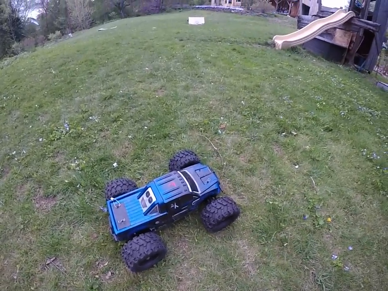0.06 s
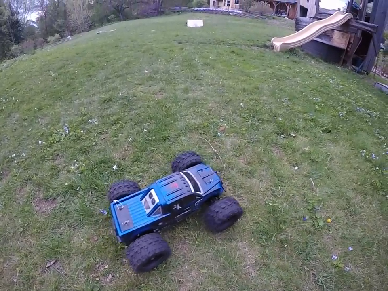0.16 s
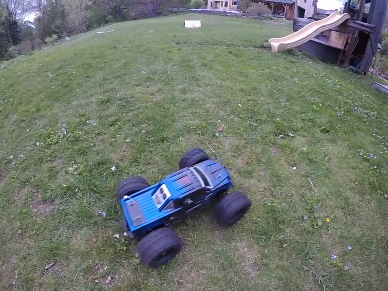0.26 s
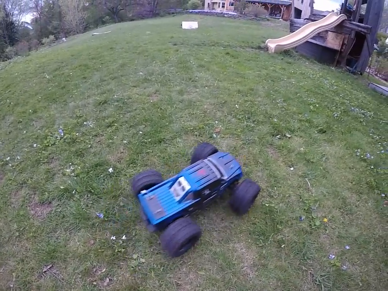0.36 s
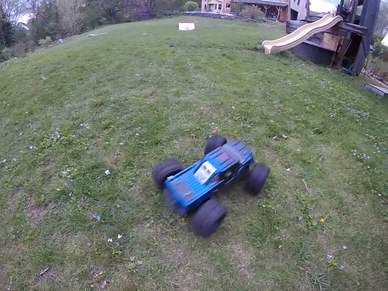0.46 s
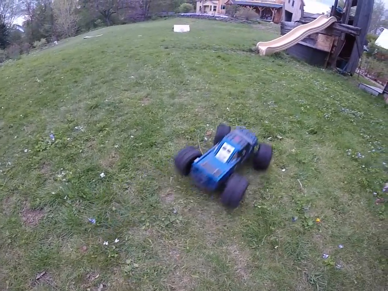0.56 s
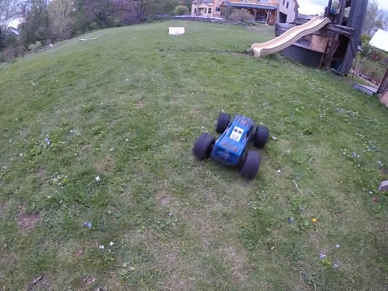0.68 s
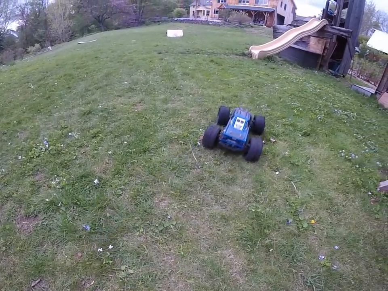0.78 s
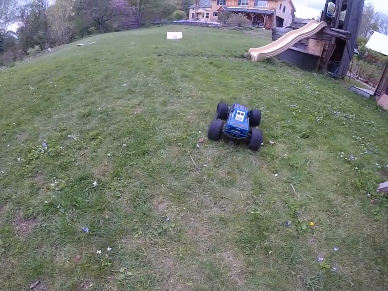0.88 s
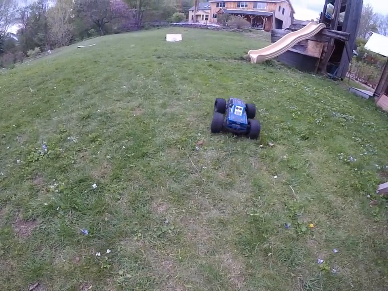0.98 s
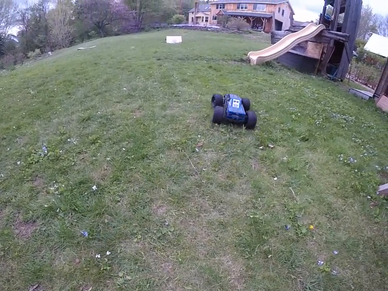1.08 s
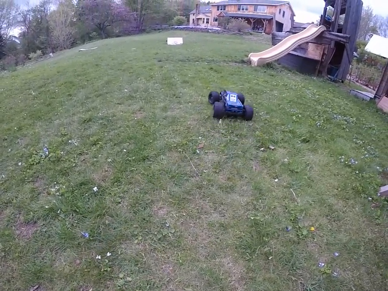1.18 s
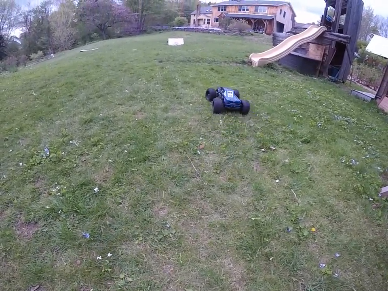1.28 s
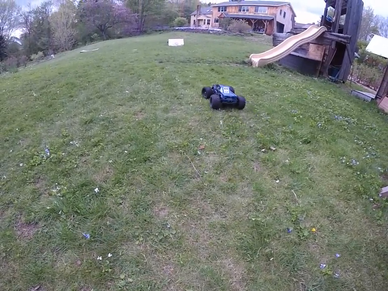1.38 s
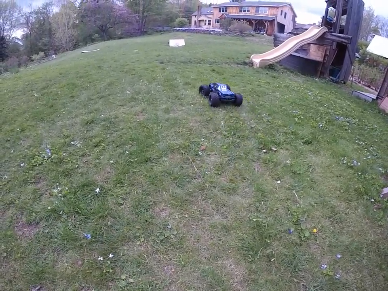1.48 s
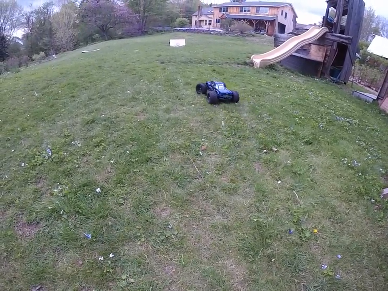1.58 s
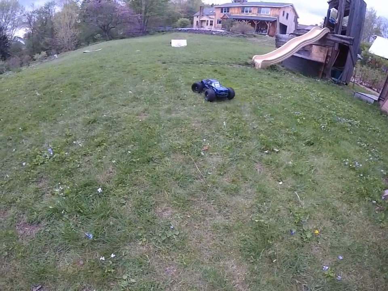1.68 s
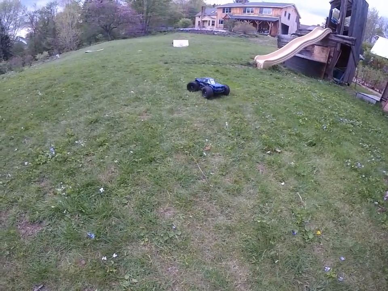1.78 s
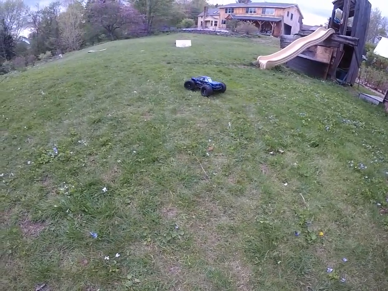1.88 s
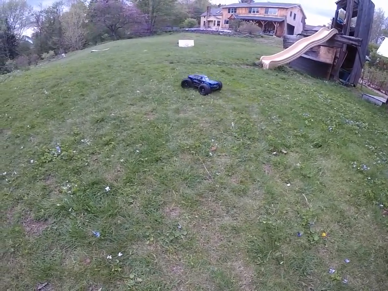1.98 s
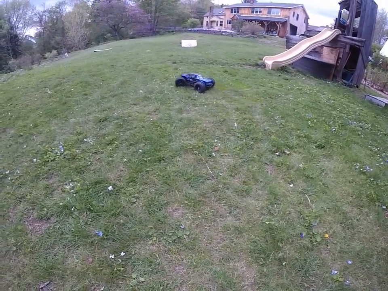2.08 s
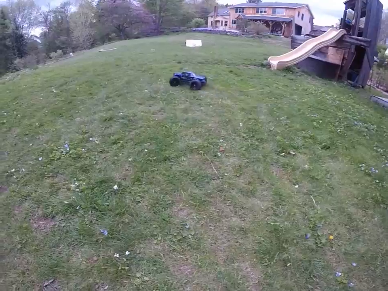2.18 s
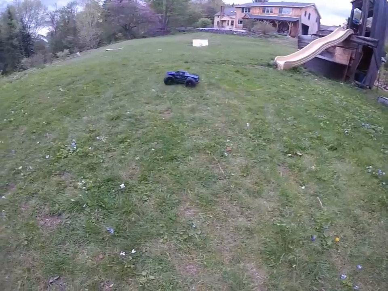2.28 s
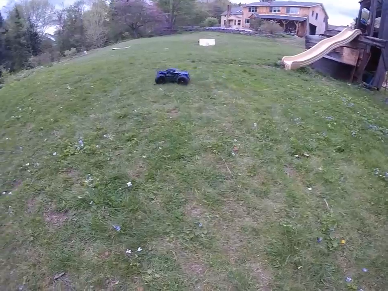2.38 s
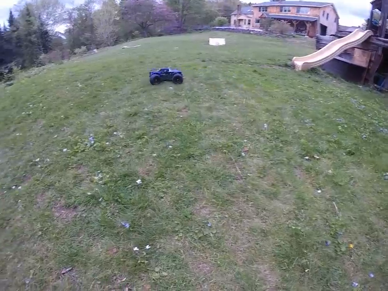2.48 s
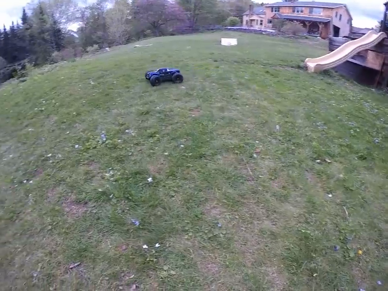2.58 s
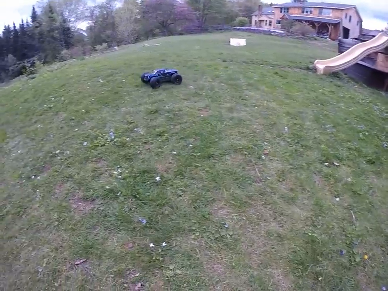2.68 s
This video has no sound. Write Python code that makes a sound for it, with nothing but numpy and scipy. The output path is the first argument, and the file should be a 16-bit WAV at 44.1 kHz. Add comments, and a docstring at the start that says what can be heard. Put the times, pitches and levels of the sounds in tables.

```python
"""Over quiet open air, a toy electric truck stutters into motion on a lawn, then drives in four bursts.
Motor and gears sing through the plastic body: sine waves and noise follow tables of pitch and level.
The controller whistles on one wavering sine; jerks, shell clacks and low bumps are short fading strikes.
Tyres rustle as filtered noise, two faint birds slide down in pitch, and a loose part jingles late on.
A low rumble of filtered noise swells near the end."""
import sys
import numpy as np
from scipy import signal
from scipy.fft import rfft, irfft
from scipy.io import wavfile
from scipy.ndimage import uniform_filter1d

SR = 44100
rng = np.random.default_rng(int(sys.argv[2]) if len(sys.argv) > 2 else 0)


def waveform_to_disk(signal):
    """Save audio, clipped to [-1, 1], as 16-bit WAV at the path in sys.argv[1]."""
    frames = np.transpose(np.atleast_2d(signal))
    scaled = np.clip(frames, -1, 1) * 32767
    samples = np.round(scaled).astype(np.int16)
    wavfile.write(sys.argv[1], SR, samples)


N = 119070
T = np.arange(N) / SR
DIFFUSE, TREBLE_DIFFUSE = 0.31, 0.53  # scattered stereo noise, as a share of the placed noise


def undb(db):
    """Turn decibels into a gain."""
    return 10 ** (np.asarray(db) / 20)


def unit(x):
    """Scale a sound to an rms (average strength) of 1."""
    return x / np.sqrt(np.mean(x ** 2))


def curve(rows, axis=1):
    """Join one column of a table by straight lines in time."""
    rows = np.array(rows)
    return np.interp(T, rows[:, 0], rows[:, axis])


def response(points, hz):
    """Read the gain at any frequency from a table of Hz and dB."""
    f, db = np.array(points).T
    return undb(np.interp(np.log(hz + 1), np.log(f + 1), db))


def colour(x, points, turn=1):
    """Filter a sound by a table of Hz and dB; turn=1j also shifts it by a quarter cycle."""
    hz = np.arange(N + 1) * SR / (2 * N)
    spectrum = rfft(x, 2 * N) * response(points, hz)
    return irfft(turn * spectrum)[..., :N]


def noise(points):
    """Make filtered noise of rms 1."""
    return unit(colour(rng.standard_normal(N), points))


def walk(rate):
    """Wander at random with rms 1, choosing a new target this many times a second."""
    k = int(SR / rate)
    steps = np.repeat(rng.standard_normal(N // k + 1), k)
    return unit(uniform_filter1d(steps, k)[:N])


def place(x, pan_db=0):
    """Two microphone ports hear a source out of step and at different levels."""
    # Each row: frequency in Hz, side signal against middle signal in dB.
    port_response = [(50, -34), (150, -7), (380, -21), (700, -3), (1290, 2.5), (2380, -5.5), (4400, -32),
                     (8000, 3.5), (15000, -22)]
    side = colour(x, port_response, 1j)
    return np.array([(x + side) * undb(pan_db / 2), (x - side) * undb(-pan_db / 2)])


def wide(points, spread):
    """Stereo noise: one placed source plus a share that differs in each ear, as if from all around."""
    return place(noise(points)) + spread * np.array([noise(points), noise(points)])


def gate(start, end, edge_s=0.002):
    """Switch on between two times, with short ramps."""
    return np.clip(np.minimum(T - start, end - T) / edge_s + .5, 0, 1)


def strike(start, rise_s, decay_s):
    """A struck object's loudness: a straight rise, then an exponential fade."""
    age = T - start
    return np.clip(age / rise_s, 0, 1) * np.exp(-np.maximum(age - rise_s, 0) / decay_s)


def garden():
    """Filtered noise makes open air, a narrow high hiss and a low rumble that swells near the end."""
    # Tone of the open air. Each row: frequency in Hz, relative level in dB.
    air_colour = [(76, -27), (130, 6), (271, 5.5), (637, -7.5), (777, -6.5), (948, -0.5), (1380, -15),
                  (1500, -18), (4380, -12.5), (4740, -18), (5130, -13.5), (7190, -15), (9130, -14),
                  (10700, -23.5), (15000, -26.5)]
    # Loudness of the rumble. Each row: time in seconds, level in dB before its flutter.
    rumble_level = [(0, -58), (1.0, -58.5), (2.0, -53.5), (2.35, -49), (2.48, -43.5), (2.58, -43.5),
                    (2.7, -50.5)]
    # Tone of the rumble. Each row: frequency in Hz, relative level in dB.
    rumble_colour = [(30, -1.5), (70, -2), (150, 6), (220, -6.5), (400, -7), (1500, -57.5)]
    air = wide(air_colour, 2.47) * undb(-58 + 2.05 * walk(13))
    hiss_hz, width_hz, hiss_db = 10480, 228, -67
    band = [(hiss_hz - 3 * width_hz, -60), (hiss_hz - width_hz, -3), (hiss_hz, 0),
            (hiss_hz + width_hz, -3), (hiss_hz + 3 * width_hz, -60)]
    hiss = wide(band, 1.0) * undb(hiss_db)
    rumble = wide(rumble_colour, 0.9) * undb(curve(rumble_level) + 2 * walk(20))
    return air + hiss + rumble


def tyres():
    """Knobbly tyres brush and crackle through grass: noise with a fast and a slow flutter."""
    # Loudness of the rolling. Each row: time in seconds, relative level in dB.
    roll_level = [(0, -53.5), (.13, -50.5), (.25, -40.5), (.45, -34), (.62, -37.5), (.72, -38), (.83, -46),
                  (.95, -46), (1.15, -45.5), (1.42, -51), (1.65, -48), (1.88, -50.5), (2.1, -42.5),
                  (2.4, -37.5), (2.55, -44.5), (2.7, -43.5)]
    # Tone of the grass. Each row: frequency in Hz, relative level in dB.
    grass_colour = [(100, -9.5), (180, 4), (350, 1), (600, 2.5), (900, -12.5), (1600, -2), (2400, -6.5),
                    (3500, -9.5), (5000, -13.5), (7000, -12), (11000, -39), (15000, -70)]
    grain_db = 1.5
    level_db = curve(roll_level) - 3 + grain_db * walk(700) + 2 * walk(35.06)
    return wide(grass_colour, TREBLE_DIFFUSE) * undb(level_db)


def controller():
    """Switching in the speed controller gives a thin whistle while the throttle is partly open."""
    # Each row: start in seconds, end in seconds, relative level in dB.
    whistle_times = [(.138, 0.292, -3.5), (0.312, 0.641, -3), (0.885, 1.127, -6.5), (1.565, 1.756, -7.5),
                     (1.94, 2.238, -4), (2.36, 2.453, 0)]
    whistle_hz, wander_rad, whistle_db = 8050, .45, -49
    level = sum(gate(start, end) * undb(db) for start, end, db in whistle_times)
    flutter = undb(whistle_db + 2 * walk(40.74))
    whistle = np.sin(2 * np.pi * whistle_hz * T + wander_rad * walk(120))
    return place(level * flutter * whistle)


def clacks():
    """The thin shell snaps against its posts, bounces once and buzzes out."""
    # Each row: start in seconds, relative level in dB, left against right in dB,
    # treble against middle in dB.
    clack_rows = [(0.139, -33.5, -2, -6), (0.183, -36.5, -1, 23), (0.2133, -58, 1, -2),
                  (0.2293, -20, -1, -1.5), (0.3007, -23.5, -1, -4), (0.3289, -37, 5, 11),
                  (0.4076, -31, -5, 13), (0.526, -27.5, -1.5, 5), (0.5993, -31, -6, 1),
                  (0.65, -34.5, -3, 9), (0.6904, -20.5, -2.5, -7.5), (0.716, -29, -1.0, -15),
                  (0.7742, -21.5, 0, -5.5), (0.789, -35, -7, -23.5), (0.864, -23.5, 0, -3),
                  (0.9156, -23.5, -1, -7), (0.946, -25.5, -3, -12), (1.0304, -35, -2, -19),
                  (1.118, -27, 0.0, -11), (1.1357, -23, -1, -7.5), (1.216, -28.5, 0, -6.5),
                  (1.24, -26.5, 0, -8), (1.3289, -34, -2, -8), (1.35, -32, 0, -9), (1.473, -25, -0.5, -4.5),
                  (1.5013, -41, 2, -11), (1.5739, -29, -1, -4.5), (1.5848, -31.5, 0, -2),
                  (1.772, -33.5, -1, 0), (1.781, -40, 0, -5), (1.8742, -31, 0, -5), (1.8968, -30.5, 0, -5),
                  (1.935, -31, 0, -4), (1.9474, -26, -1, -5.5), (2.2374, -34.5, 0.0, 8),
                  (2.4528, -34, -5, 3), (2.5178, -30, 0, -4), (2.536, -37, -1.0, 2), (2.585, -28, 1, -4.5),
                  (2.6515, -26.5, 1, -6)]
    # Tone of the shell. Each row: frequency in Hz, relative level in dB.
    shell_colour = [(200, -37.5), (600, -24), (1000, -18.5), (1600, -11), (2600, -9.5), (3200, -1),
                    (3550, 3), (3800, -0.5), (4100, 6.5), (4900, -9), (6400, 0.5), (8000, -12),
                    (11000, -25.5), (13300, -20), (16000, -47)]
    clack_db, rise_s, decay_s = -7, 0.0011, 0.0028
    rattle_rise_s, rattle_decay_s, rattle_db = 0.0027, 0.03, -18
    bounce_s, bounce_db = 0.0042, -15.5  # average delay, level against the first snap
    dull, bright = 0, 0
    for start, db, pan_db, treble_db in clack_rows:
        again = start + bounce_s * (.5 + rng.random())
        snap = strike(start, rise_s, decay_s)
        bounce = undb(bounce_db) * strike(again, rise_s, decay_s)
        rattle = undb(rattle_db) * strike(start, rattle_rise_s, rattle_decay_s)
        pan = np.array([[pan_db], [-pan_db]]) / 2
        loudness = (snap + bounce + rattle) * undb(db + clack_db + pan)
        dull = dull + loudness * undb(-treble_db / 2)
        bright = bright + loudness * undb(treble_db / 2)
    buzz = wide(shell_colour, TREBLE_DIFFUSE)
    middle = colour(buzz, [(3000, 5.5), (5500, -17.5), (9000, -50)])  # Hz, dB
    return dull * middle + bright * (buzz - middle)


def jerks():
    """The motor cogs with a short gritty buzz as gear slack is taken up; the chassis thuds on after it."""
    # The drive jerks as the motor catches. Each row: start in seconds, relative level in dB.
    jerk_rows = [(0.142, -25.5), (.177, -31), (0.206, -33.5), (0.229, -24.5), (0.237, -25), (0.264, -25),
                 (.301, -27.5), (0.307, -21), (0.331, -21), (0.35, -20.5), (0.369, -25), (0.623, -27.5),
                 (0.922, -27.5), (1.588, -37), (1.956, -40), (2.418, -29)]
    # Tone of the buzz and grit. Each row: frequency in Hz, relative level in dB.
    jerk_colour = [(120, -32), (300, -15), (600, 5), (900, -7), (1300, 1.5), (1900, 3.5), (2300, -0.5),
                   (2700, -19.5), (5000, -11), (12000, -37)]
    # Tone of the chassis thud. Each row: frequency in Hz, relative level in dB.
    thud_colour = [(100, -26), (250, 2.5), (400, 7), (600, 8), (900, -8), (3000, -56)]
    cog_hz, wobble = 320, .025  # wobble is a share of the pitch
    rise_s, crunch_decay_s, thud_decay_s = 0.0032, 0.0056, 0.023
    buzz_db, grit_db, thud_db = -4.5, -4, -13
    phase = 2 * np.pi * np.cumsum(cog_hz * (1 + wobble * walk(150))) / SR
    harmonics = sum(np.sin(k * phase + 2 * np.pi * rng.random()) for k in range(1, 9))
    buzz = place(unit(colour(harmonics, jerk_colour)))
    teeth = undb(buzz_db) * buzz + undb(grit_db) * wide(jerk_colour, DIFFUSE)
    crunch = sum(undb(db) * strike(start, rise_s, crunch_decay_s) for start, db in jerk_rows)
    thud = sum(undb(db + thud_db) * strike(start, rise_s, thud_decay_s) for start, db in jerk_rows)
    return crunch * teeth + thud * wide(thud_colour, DIFFUSE)


def drive():
    """Motor harmonics, shaft tones and gear rasp follow the speed and sound through the body."""
    # One table per burst of throttle. Each row: time in seconds, motor pitch in Hz before its wobble.
    speed_tables = [
        [(.36, 470.4), (.385, 487.4), (.41, 540.3), (.423, 633.5), (.444, 672), (.475, 602), (.497, 634.6),
         (.523, 787), (.57, 756.7), (.59, 773), (.613, 885), (.638, 754)],
        [(.89, 538.4), (.925, 550.8), (.94, 641), (.955, 616.6), (.978, 656.4), (1.015, 610), (1.04, 642),
         (1.063, 661), (1.125, 552)],
        [(1.595, 419.8), (1.61, 453.6), (1.635, 495.5), (1.652, 545.4), (1.68, 555.7), (1.708, 509),
         (1.735, 582)],
        [(1.94, 539.7), (1.995, 566.5), (2.025, 626), (2.052, 572.5), (2.085, 767), (2.11, 767.2),
         (2.15, 685.7), (2.178, 605.3), (2.215, 763), (2.25, 814), (2.275, 937.4), (2.305, 1064),
         (2.332, 983.4), (2.37, 1221), (2.395, 1185), (2.418, 1415), (2.433, 1148)],
    ]
    # One table per burst. Each row: time in seconds, relative level in dB, left against right in dB,
    # relative level of the gear hiss in dB, lift of the first harmonic in dB.
    effort_tables = [
        [(0.345, -27, -13, -45, 0), (0.38, -27.5, -3, -37, -10), (0.415, -27.5, -8, -42, -19),
         (0.421, -22, -6, -47, -7), (0.471, -18.5, -3.5, -42.5, 2.5), (0.583, -19.5, 0.5, -32, 9),
         (0.591, -30.5, 0, -33, 3), (0.635, -28.5, 4, -38, 6.5), (0.647, -45, 4, -50, 0),
         (0.66, -49, 1.0, -54, 0)],
        [(0.87, -50, -1, -43, -12), (0.905, -37, 2, -39, -15), (0.919, -37, 7, -33, -6),
         (0.925, -22, 1, -45, -14), (0.937, -34, 1, -37.5, 4), (0.983, -26, 0.5, -35.5, -1.5),
         (1.009, -35.5, 4, -39, -7), (1.037, -27, -1.5, -36.5, 2.5), (1.093, -41, 5, -41, -5),
         (1.143, -42, -7, -52, 30), (1.15, -56, 1.5, -48, 0)],
        [(1.575, -65.5, 1.5, -55, -5.5), (1.593, -36, 8, -41, -4), (1.605, -41, 4, -44, 7),
         (1.631, -33.5, -1, -44, 3.5), (1.715, -39.5, 2, -40, -3.5), (1.751, -43, -2, -44.5, 3),
         (1.82, -68, 0, -52, 0)],
        [(1.945, -44, -7, -36, 29), (1.961, -30.5, 3.5, -46, 5.5), (2.031, -24.5, -1, -43, 2.5),
         (2.051, -28.5, 3, -38, -1.5), (2.129, -31.5, 4.5, -41, -1), (2.169, -28, -1.5, -47, 9),
         (2.257, -34.5, 8, -43.5, 2), (2.325, -30.5, 5.5, -34, 7.5), (2.42, -35, 6, -40, -0.5),
         (2.459, -31.5, 16, -33, 2.5), (2.47, -49, 3, -63, 0)],
    ]
    # Each row, one per burst: motor harmonics 1 to 4, gear rasp, shaft tones, all relative levels in dB.
    timbre_rows = [(-0.52, 9.5, -4.5, -3, -8.5, -14.5), (1, 3.5, 8, 4.5, -4, -13),
                   (0, 2.5, -6.5, -14.5, -6.5, -19), (0.6, 0, -0.5, 3.5, -9, -19)]
    # Response of the body. Each row: frequency in Hz, relative level in dB.
    body_colour = [(120, -11), (250, -9), (400, 1), (480, -10), (610, 9), (690, 1), (765, -3.5),
                   (850, -11.5), (1030, -10), (1150, -10.5), (1300, -3.5), (1430, -3), (1570, 6.5),
                   (1730, 5.5), (1900, 6), (2100, 2), (2300, 1), (2500, -11.5), (2750, -24), (3100, -9.5),
                   (4300, -16), (8000, -42)]
    # Tone of the gear hiss. Each row: frequency in Hz, relative level in dB.
    gear_colour = [(1500, -1), (2700, 2.5), (3100, 10.5), (4200, 1.5), (5000, -7), (6300, 1.5), (7700, -7),
                   (8700, -18), (11000, -33), (15000, -67)]
    # The drive shafts bind once a turn, so level and speed throb.
    throb_cycles, throb_db, throb_sag = 16, 2.4, .012  # motor cycles per turn, dB, share of the speed
    wobble, slip_rad, flutter_db = .015, .28, 3.4  # random share of the pitch, phase slip, level flutter
    chatter_hz, chatter_db = 330.8, 1.8  # gear teeth rattle in their slack
    # At high speed the gears scream: harmonics from the third up gain between two pitches.
    scream_from_hz, scream_full_hz, scream_db = 770, 1060, 4.5
    upper_db, mesh_depth = -4, 0.56  # harmonics 5 to 7, swing of the rasp and hiss as teeth mesh
    whine_db, hiss_share_db = -3, -2.5
    out = 0
    for speed, effort, timbre in zip(speed_tables, effort_tables, timbre_rows):
        first, second, third, fourth, rasp_db, shaft_db = timbre
        turn = 2 * np.pi * np.cumsum(curve(speed)) / SR / throb_cycles + 0.67 * walk(30)
        hz = curve(speed) * (1 + wobble * walk(170) + throb_sag * np.cos(turn))
        phase = 2 * np.pi * np.cumsum(hz) / SR

        scream = scream_db * np.clip((hz - scream_from_hz) / (scream_full_hz - scream_from_hz), 0, 1)
        harmonics = [first + curve(effort, axis=4), second]
        harmonics += [db + scream for db in [third, fourth] + [upper_db] * 3]
        shafts = [(k + .5, shaft_db) for k in range(1, 5)]  # halfway between the harmonics
        tone = 0
        for k, db in list(enumerate(harmonics, 1)) + shafts:
            level = undb(db + flutter_db * walk(80))
            tone = tone + level * np.sin(k * phase + slip_rad * walk(200) + 2 * np.pi * rng.random())
        tone = colour(tone, body_colour)
        # even out the slow loudness changes, leaving those to the effort table
        tone = tone / np.sqrt(uniform_filter1d(tone ** 2, size=1300) + 1e-12)
        tone = tone * undb(chatter_db * walk(chatter_hz) + throb_db * np.sin(turn))
        tone = tone * gate(speed[0][0], speed[-1][0], 0.0074)

        mesh = (1 + mesh_depth * np.sin(phase / 2)) * undb(throb_db * np.sin(turn) / 2)
        song = place(tone) + undb(rasp_db - 3) * mesh * wide(body_colour, DIFFUSE)
        pan = curve(effort, axis=2) * np.array([[1], [-1]]) / 2
        song = song * undb(curve(effort) - 3.5 + pan)

        # the gear teeth add high tones at every half multiple of the motor pitch
        whine = 0
        for k in range(7, 22):
            whine = whine + undb(flutter_db * walk(50)) * np.sin(k * phase / 2 + 2 * np.pi * rng.random())
        gears = undb(whine_db) * place(unit(colour(whine, gear_colour)))
        gears = gears + undb(hiss_share_db) * mesh * wide(gear_colour, TREBLE_DIFFUSE)
        hiss = gears * undb(curve(effort, axis=3) - 4 + 2.2 * walk(150))
        out = out + gate(effort[0][0], effort[-1][0]) * (song + hiss)
    return out


def bumps():
    """Soft hollow tyres and the chassis boom over bumps, each a low sine that soon fades."""
    # Each row: start in seconds, pitch in Hz, relative level in dB.
    bump_rows = [(0.359, 400, -23.5), (1.585, 430, -36.5), (1.775, 300, -44.5), (2.435, 291, -42.5),
                 (2.45, 162, -35), (2.502, 158, -32), (2.555, 147, -35), (2.615, 153.6, -41.5)]
    rise_s, decay_s = 0.009, 0.021
    boom = 0
    for start, hz, db in bump_rows:
        ring = np.sin(2 * np.pi * hz * (T - start))
        boom = boom + undb(db) * strike(start, rise_s, decay_s) * ring
    return place(boom)


def bird():
    """Faint downward bird whistles: sine waves with a falling, slightly wavering pitch."""
    # Each row: start in seconds, end in seconds, first pitch in Hz, last pitch in Hz, relative level in dB.
    slur_rows = [(1.42, 1.45, 7900, 6600, -56), (1.788, 1.87, 4520, 3680, -51)]
    out = 0
    for start, end, from_hz, to_hz, db in slur_rows:
        hz = curve([(start, from_hz), (end, to_hz)]) * (1 + .006 * walk(400))
        swell = np.sin(np.pi * np.clip((T - start) / (end - start), 0, 1)) ** .5
        whistle = np.sin(2 * np.pi * np.cumsum(hz) / SR)
        out = out + swell * undb(db + 2 * walk(90)) * whistle
    return place(out)


def jingle():
    """A loose part jingles at speed and as the truck coasts: a narrow noise ring, shaken unevenly."""
    # Each row: time in seconds, relative level in dB.
    jingle_level = [(2.2, -65), (2.25, -43), (2.44, -43.5), (2.48, -55), (2.52, -43.5), (2.56, -63),
                    (2.61, -37), (2.64, -63), (2.7, -49)]
    # Tone of the ring. Each row: frequency in Hz, relative level in dB.
    jingle_colour = [(1800, -50), (2220, -16), (2320, -4), (2420, -9), (2900, -50)]
    shaking = undb(curve(jingle_level) - 4.5 + 3.1 * walk(70))
    return wide(jingle_colour, DIFFUSE) * shaking * gate(jingle_level[0][0], N / SR)


def scene():
    """Add the truck to the garden around it."""
    background = garden() + bird()
    contact = tyres() + clacks() + bumps() + jingle()
    motor = controller() + jerks() + drive()
    return background + contact + motor


def record(dry):
    """Cut the bass by a table and the very top with a steep low-pass filter."""
    # Each row: frequency in Hz, level in dB.
    bass_cut = [(20, -23), (60, -13.5), (105, -26), (120, -29), (135, -0.5), (200, -0.5)]
    top_hz = 14900
    low_pass = signal.ellip(8, .2, 70, top_hz, fs=SR, output="sos")
    return signal.sosfilt(low_pass, colour(dry, bass_cut))


dry = scene()
out = record(dry)
waveform_to_disk(out)
```